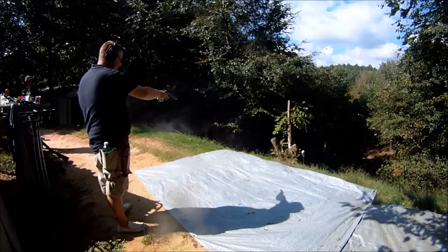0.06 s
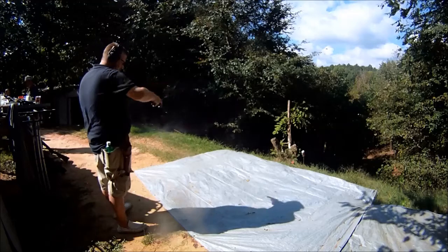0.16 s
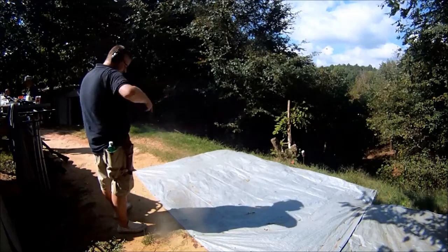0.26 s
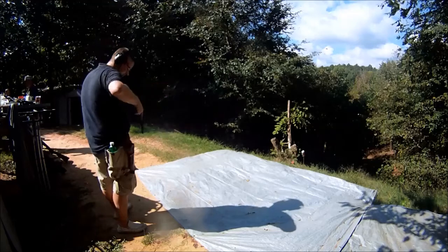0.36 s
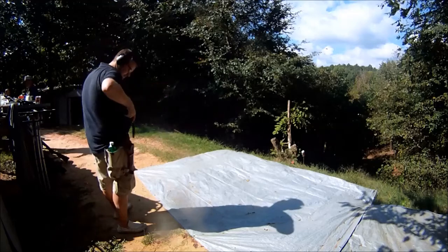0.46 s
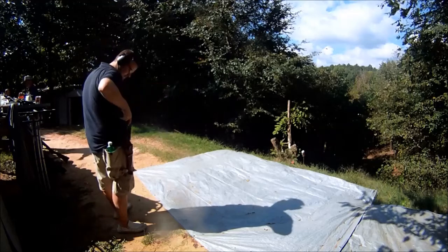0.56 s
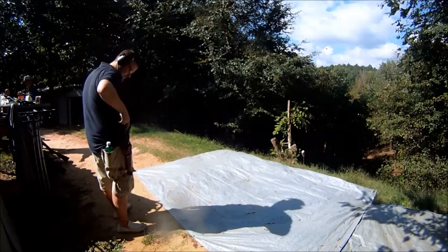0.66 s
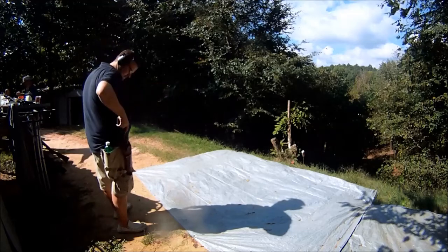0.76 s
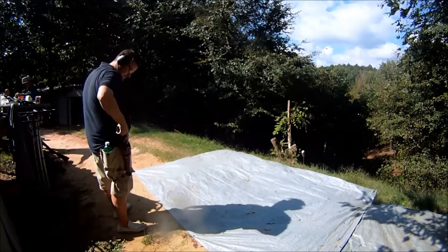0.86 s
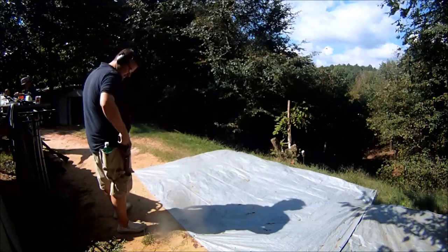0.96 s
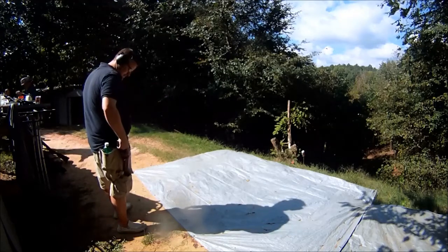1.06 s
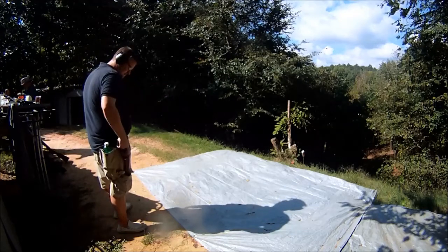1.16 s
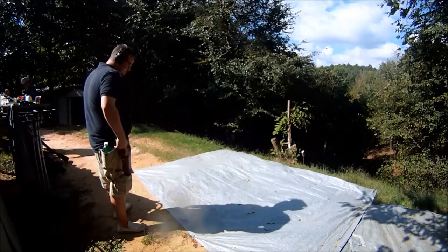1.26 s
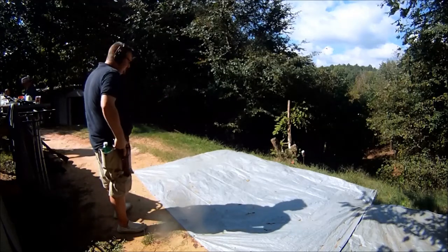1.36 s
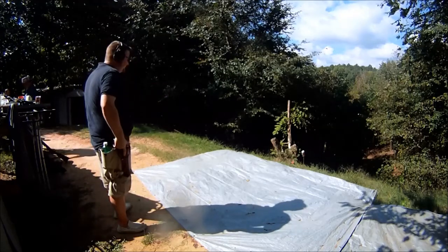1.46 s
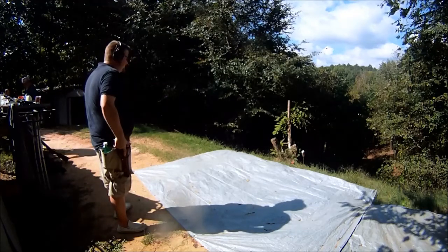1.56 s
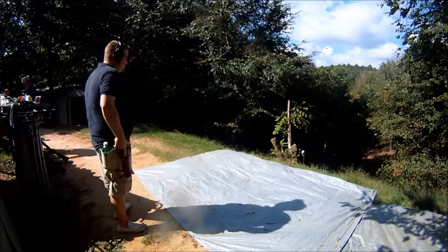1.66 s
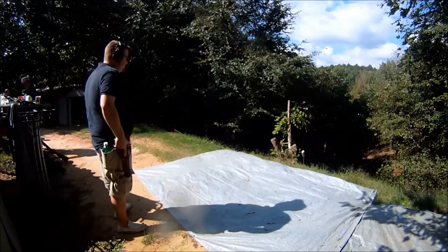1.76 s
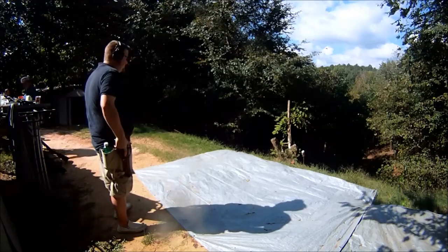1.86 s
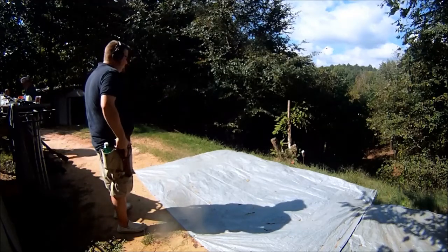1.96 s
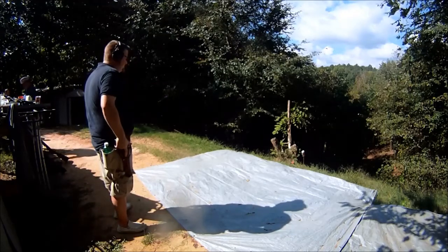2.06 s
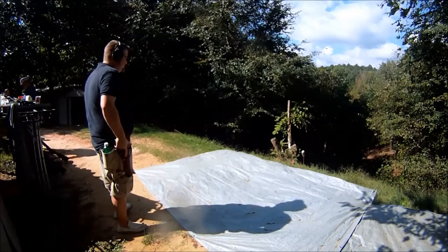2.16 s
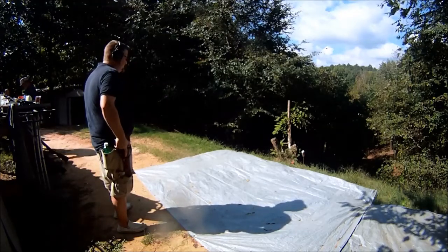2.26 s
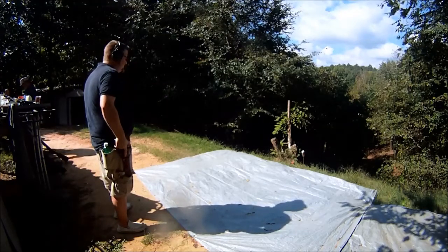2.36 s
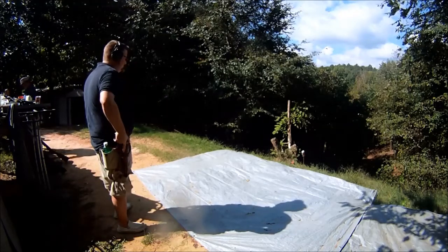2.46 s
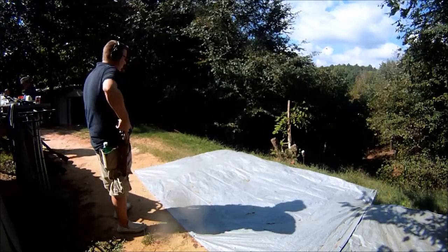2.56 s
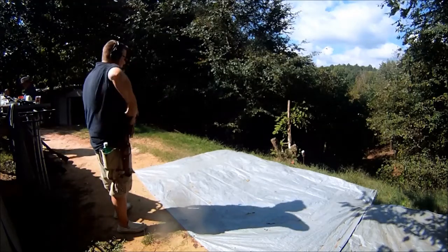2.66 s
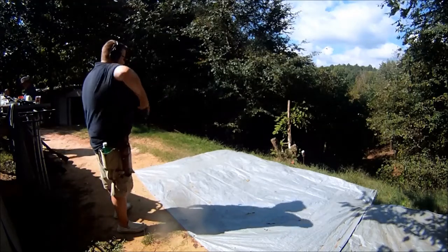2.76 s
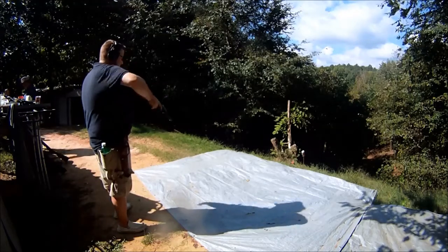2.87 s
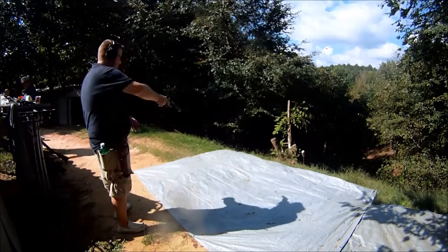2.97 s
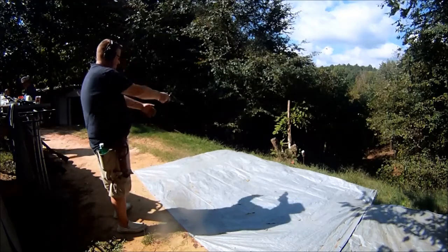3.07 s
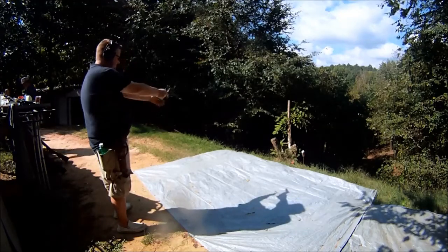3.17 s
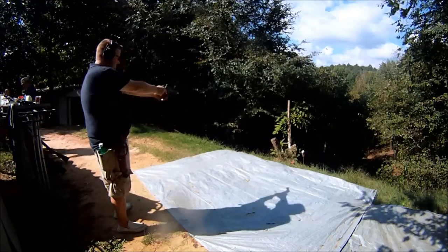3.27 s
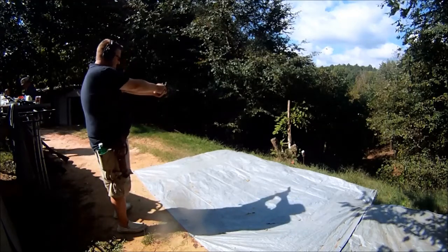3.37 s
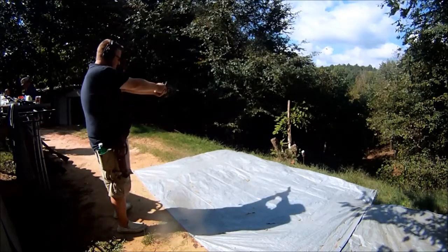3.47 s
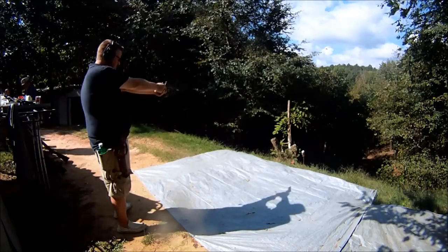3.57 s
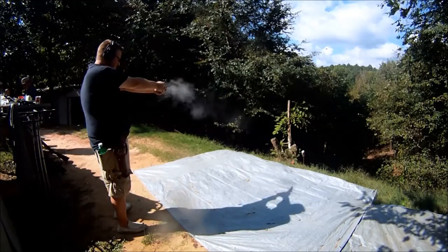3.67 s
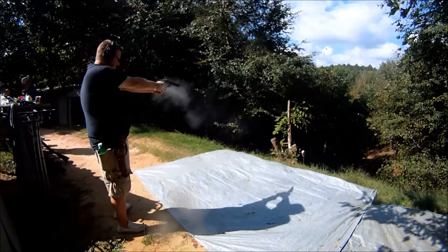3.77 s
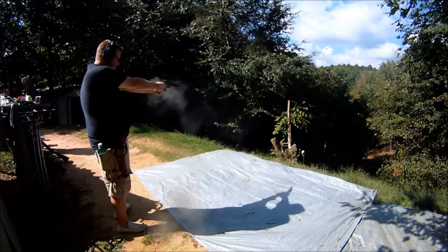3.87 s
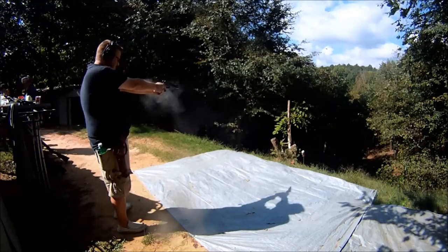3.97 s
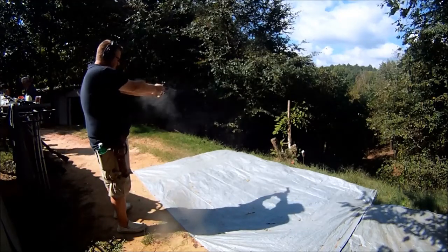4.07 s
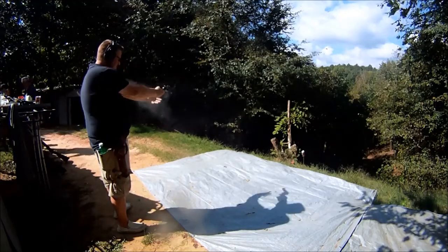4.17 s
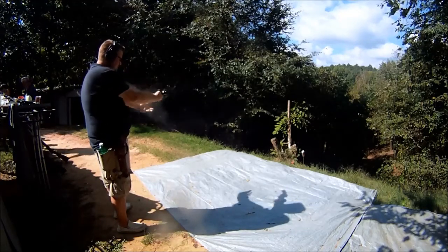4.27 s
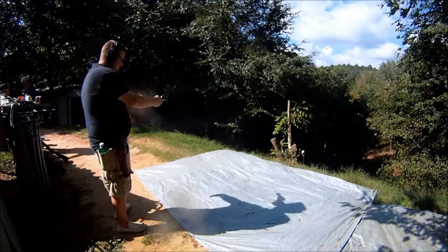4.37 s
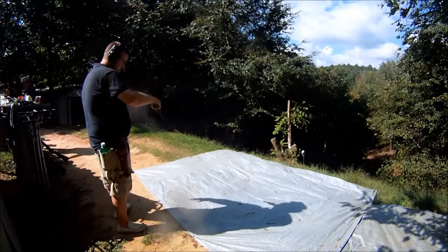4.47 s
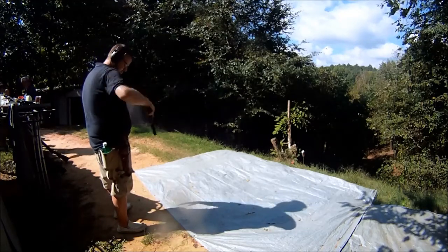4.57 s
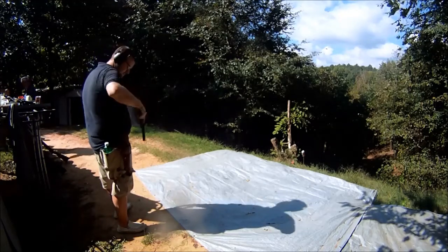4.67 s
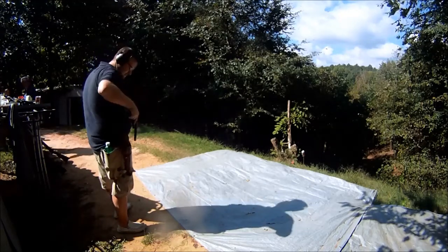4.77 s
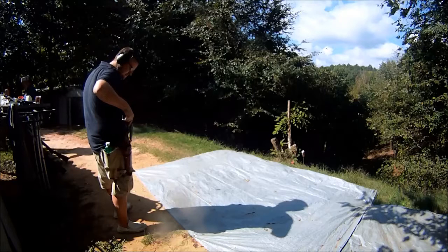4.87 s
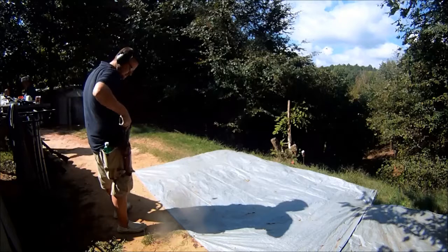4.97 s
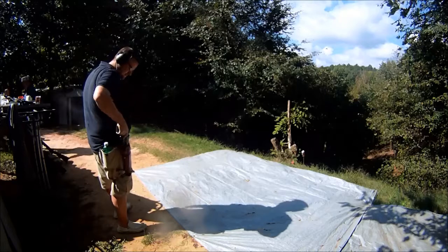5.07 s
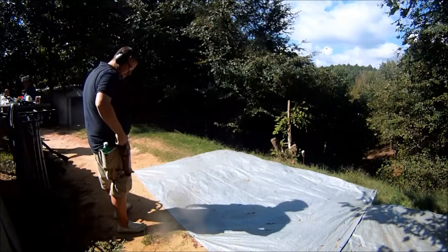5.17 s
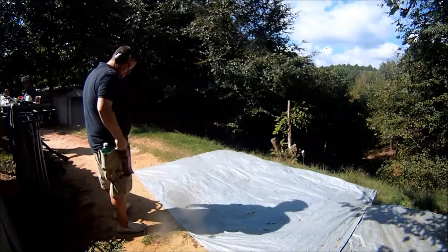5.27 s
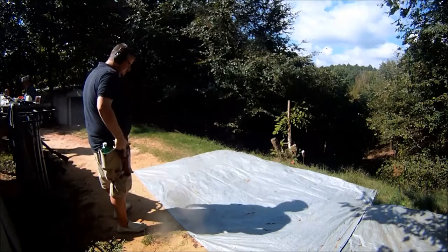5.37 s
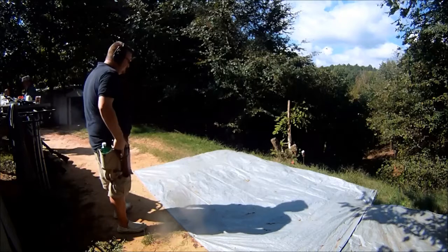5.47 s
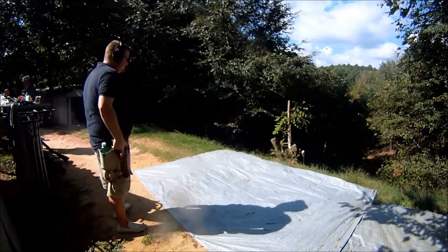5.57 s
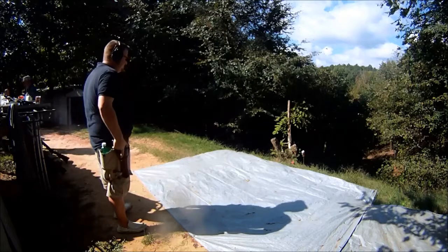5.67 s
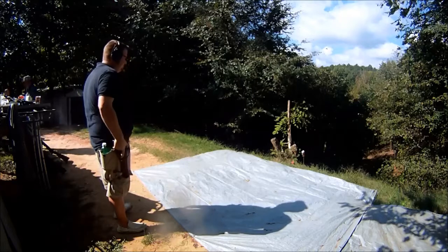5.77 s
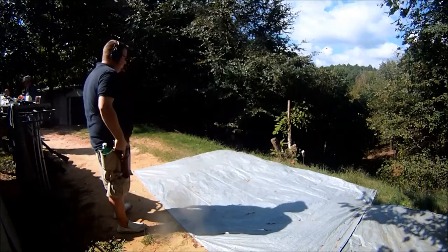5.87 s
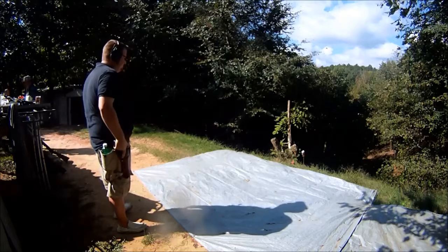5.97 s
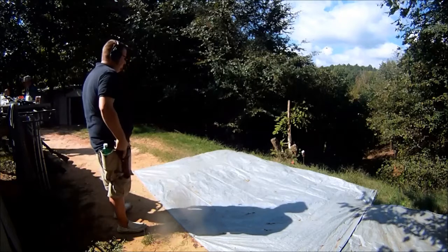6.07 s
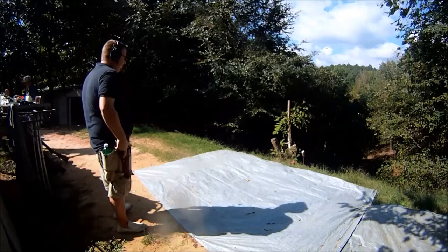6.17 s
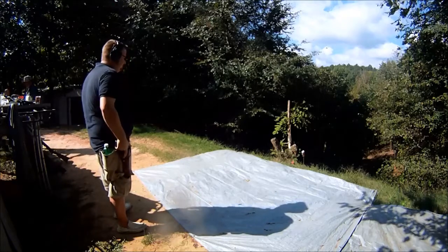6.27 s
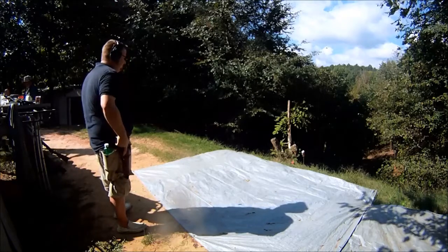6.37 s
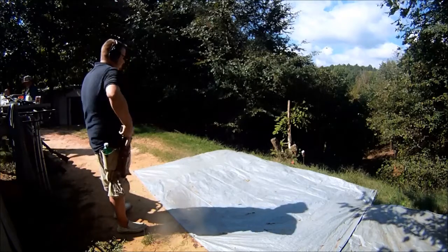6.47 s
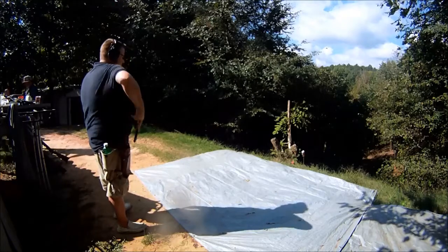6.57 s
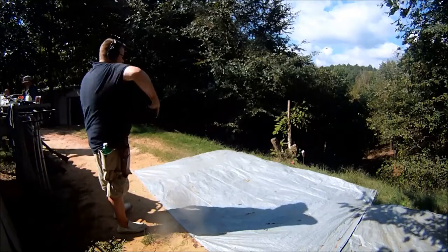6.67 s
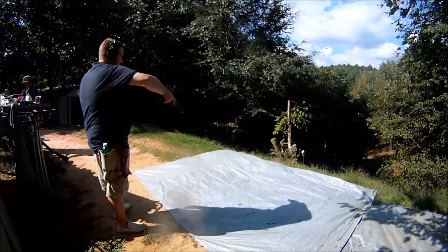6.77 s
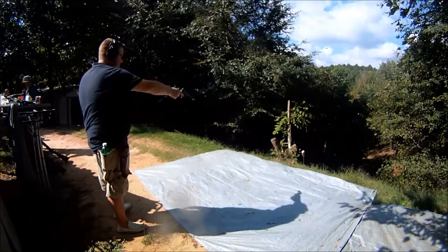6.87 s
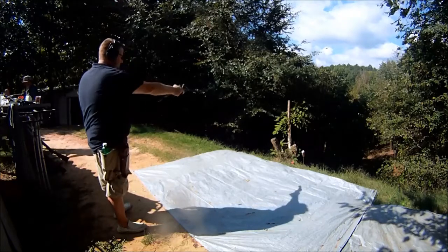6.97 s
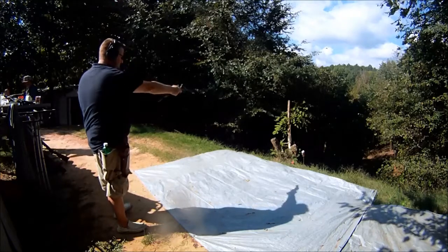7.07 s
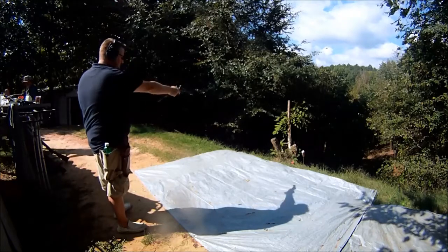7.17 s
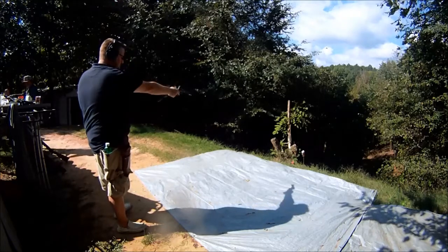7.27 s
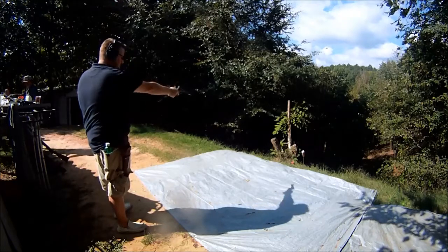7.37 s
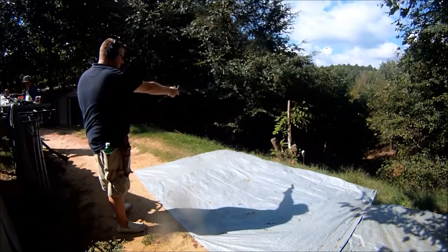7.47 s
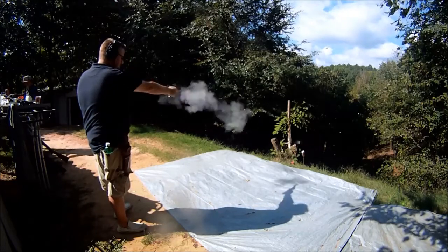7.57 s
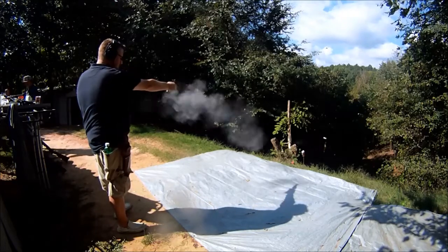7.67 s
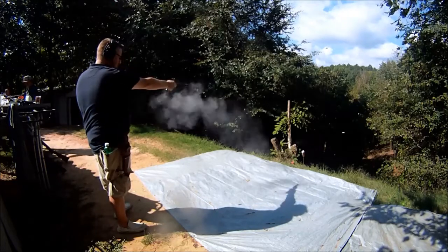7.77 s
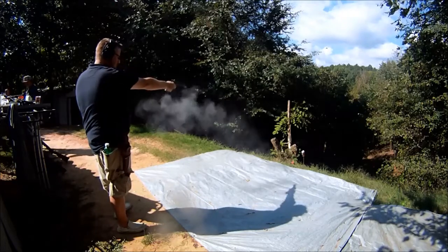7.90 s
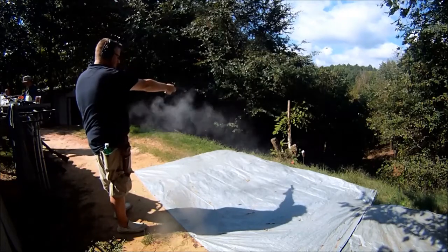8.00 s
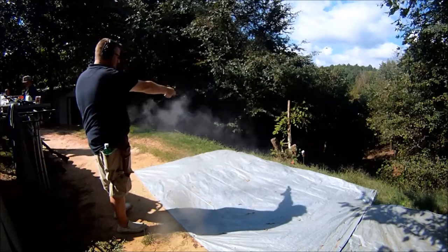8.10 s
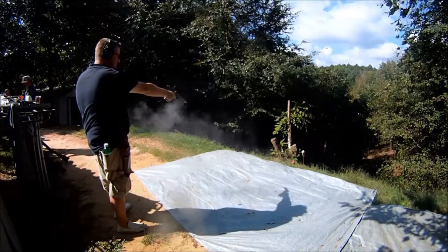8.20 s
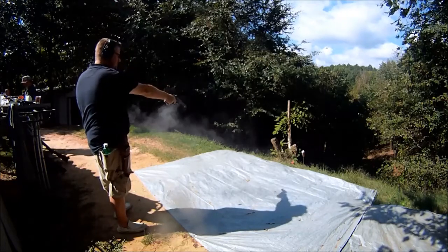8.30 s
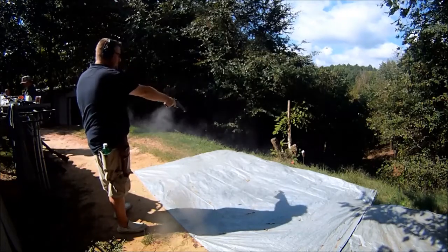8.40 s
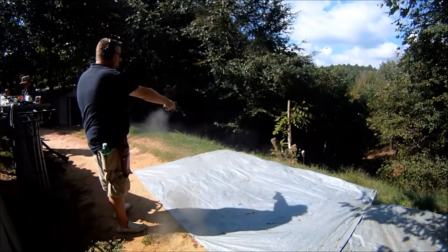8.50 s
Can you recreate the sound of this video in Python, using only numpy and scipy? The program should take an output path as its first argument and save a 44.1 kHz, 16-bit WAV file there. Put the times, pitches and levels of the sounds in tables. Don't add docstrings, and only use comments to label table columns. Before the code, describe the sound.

Two overloaded revolver shots, seconds apart on a wooded slope, each rolling back in echoes, with holster scrapes and ticks between.

```python
import sys
import numpy as np
from scipy import signal
from scipy.io import wavfile
from scipy.ndimage import uniform_filter1d

SR = 44100
rng = np.random.default_rng(int(sys.argv[2]) if len(sys.argv) > 2 else 0)


def attenuation_scalar(level_db):
    decades = np.asarray(level_db, float) / 20
    return 10 ** decades


def master(y):
    cut = np.clip(np.atleast_2d(y).T, -1, 1)
    pcm = np.round(cut * 32767)
    wavfile.write(sys.argv[1], SR, pcm.astype(np.int16))


N = 376613

# start_s, level_db, front_ms
BLASTS = [
    [(3.6891, 30, .5), (3.6901, 28, .25), (3.6915, 28, .15), (3.6919, 30, 1.15), (3.6933, 30, .3),
     (3.6946, 34, 1.35)],
    [(7.6730, 28, .4), (7.6735, 30, .3), (7.6739, 32, .45), (7.6751, 32, .2), (7.6755, 36, 1.9),
     (7.6780, 45, 3.2)],
]
# level_db, fade_60db_s, hold_ms (until the gain falls), cut_db
SPLASH = [(15, 0.037, 5.7, -17), (14, 0.041, 6.67, -11)]
EARLIER_SHOT_S = -0.53
FIRED_S = [EARLIER_SHOT_S] + [arrivals[0][0] for arrivals in BLASTS]
# pitch_hz, level_db (per Hz)
OUTDOOR_TONE = [(35, -52), (60, -20), (145, -13.5), (205, -12.5), (280, -8), (477, -2), (600, -3),
                (750, -6.5), (934, -15), (1320, -14.5), (2490, -6.5), (3320, -21.5), (3790, -20),
                (5900, -35.5), (7670, -65.5), (13000, -120)]

# after_shot_s, level_db
VALLEY_ROLL = [(.02, -36.5), (.14, -37), (.36, -24.5), (.6, -36), (.8, -35.5), (1.3, -41.5), (1.7, -44.5),
               (2.4, -55), (3.2, -64)]
ROLL_GAIN_DB = [-2.06, -2.12, 6]
GAIN_BACK_S = 0.92
# low_hz, high_hz, share_db, air_loss_db_per_s, loss_until_s
VALLEY_BANDS = [(83, 618, -1.5, -1.14, 0.91), (603, 915, -1, 3.5, 2.9), (910, 3100, 2.65, 24.5, 1),
                (3070, 9000, -5, 36.5, 1.11)]
# level_db, sinking_db_per_s, clumping_db, kept (share of a stronger shot)
NEAR_TREES = [(-37.5, 62.5, 0.38, 0.98), (-39.5, 50.5, 0.86, 0.93), (-39.5, 9, -0.25, 0.53),
              (-35, 15, -0.9, 0.2)]
TREELINE_S, BEYOND_DB_PER_S = 0.36, 58
PORT_HZ, PORT_WIDTH_HZ, PORT_DB = 3830, 350, -12
# after_shot_s, peak_db, fade_60db_s
RIDGE = (0.57, -21.5, 0.17)
# start_s, peak_db, fade_60db_s
SLAPS = [(.23, -18, 0.14), (.46, -25, 0.29), (0.862, -44, 0.055), (0.991, -50, 0.071), (1.052, -27.5, 0.18),
         (4.022, -5, 0.045), (4.055, -30, 0.055), (4.455, -18, 0.14), (4.877, -25.5, 0.13),
         (5.338, -47, 0.058), (5.827, -52, 0.051), (6.58, -41, 0.14), (6.666, -35.5, 0.1),
         (7.589, -34, 0.13), (8.038, -7, 0.065), (8.09, -9, 0.18), (8.445, -25, 0.15)]

# hardest_s, rise_s, fall_s, scrape_db, hollow_body_db
RUBS = [(0.719, .02, .1, -66, -70), (1.062, 0.057, 0.17, -56.5, -42), (2.077, 0.019, 0.09, -44.5, -36.5),
        (2.127, 0.028, 0.13, -51, -42.5), (2.158, 0.014, .12, -49, -35), (2.205, 0.057, 0.26, -58, -48),
        (2.337, 0.036, 0.05, -63, -56), (2.547, 0.024, 0.11, -62, -47.5), (2.67, 0.076, 0.048, -61, -47.5),
        (2.868, 0.063, 0.054, -49.5, -46.5), (2.897, .012, .2, -49.5, -56), (4.625, 0.064, 0.3, -53, -37),
        (5.2, .03, 0.067, -61, -68.5), (6.765, 0.018, 0.065, -62, -46), (6.801, 0.1, 0.12, -55, -41.5),
        (6.921, 0.19, 0.065, -60, -62), (6.952, .012, 0.058, -40, -50), (6.995, 0.011, 0.2, -59, -53),
        (7.325, 0.049, 0.18, -62.5, -49.5), (7.42, .06, .2, -69.5, -62), (7.611, 0.044, 0.072, -62, -46),
        (7.655, 0.024, 0.061, -71, -46.5)]
# pitch_hz, level_db (per Hz)
STEEL_TONE = [(710, -55.5), (1200, -44), (1460, -13), (1640, -9), (2220, 1.5), (3200, -14.5), (3830, -6.5),
              (4990, -12.5), (5900, -65), (7670, -37), (13000, -120)]
STROKE_DB = 29.5
GAP_HZ, GAP_OPENS, SQUEAK_DB = 2400, 0.053, -1.5
# start_s, peak_db, fade_60db_s, ring_hz
RINGS = [(0.3721, -50, 0.15, 2550), (0.6237, -48.5, 0.073, 2480), (0.704, -47, 0.13, 2480),
         (0.713, -53, 0.064, 2730), (0.7302, -51, .06, 2580), (.742, -52, .06, 2720),
         (0.7564, -52, 0.046, 2550), (0.7751, -43.5, 0.052, 2400), (.786, -51, 0.054, 2960),
         (2.6683, -58, 0.11, 3650), (2.56, -67, .1, 2500), (2.66, -69, .08, 2350), (2.888, -41, 0.23, 3760),
         (4.615, -56, .14, 3800), (5.205, -60, 0.092, 3660), (6.328, -62, .03, 4800),
         (6.76, -53.5, 0.93, 2400), (6.946, -44.5, 0.24, 3900), (7.0, -55, 0.29, 2870),
         (7.395, -62, 0.34, 2170)]
# start_s, peak_db, fade_60db_s, ring_hz
TICKS = [(0.9687, -49, 0.043, 3850), (0.9997, -44, .066, 3900), (1.0994, -51, 0.12, 3960),
         (2.841, -46.5, 0.1, 2620), (2.8856, -28, 0.077, 3040), (2.8975, -34, 0.043, 2400),
         (4.615, -48, .14, 2400), (5.18, -52, .07, 3300), (5.3235, -56, 0.052, 2400),
         (6.92, -46, 0.14, 2550), (6.943, -29.5, 0.05, 3090), (8.322, -36, 0.086, 2460)]
# start_s, peak_db, fade_60db_s, ring_hz
KNOCKS = [(2.0695, -36.5, .1, 2400), (2.1274, -52, .096, 2540), (2.15, -38, 0.18, 2420),
          (2.1994, -38, 0.066, 2450), (2.5406, -66, .06, 2300), (2.8646, -56, .07, 2510),
          (6.755, -44.5, 0.16, 2370), (6.8194, -61, 0.068, 2400), (6.993, -44, 0.089, 2830),
          (7.2704, -51, .06, 2450), (7.3168, -48, 0.042, 2470)]
# thud_db, ring_db (beside the tick), rise_ms
CONTACT = [(-24, 9.5, 0.93), (-2.5, 3, 0.55), (9, -4.5, 1.5)]

# pitch_hz, level_db (per Hz)
AIR_TONE = [(8, -29.5), (20, -4), (120, -8), (216, -11), (781, -24.5), (1090, -27.5), (1200, -26.5),
            (1380, -25), (1560, -31.5), (1880, -25.5), (2510, -28), (4760, -33.5), (5900, -41), (7670, -74),
            (13000, -120)]
AIR_DB = -52.5
# pitch_hz, width_hz, level_db
HUM = [(119.3, 3, -58.5), (58.5, 4, -65), (163, 4, -65)]
WAVER = 0.35


def evened(x):
    return x / np.sqrt(np.mean(x ** 2) + 1e-20)


def add(mix, start_s, sound):
    part = mix[round(start_s * SR):][:len(sound)]
    part += sound[:len(part)]


def coloured(x, tone, lo_hz=1, hi_hz=20000):
    hz = np.fft.rfftfreq(4096, 1 / SR) + 1
    tone_hz, tone_db = np.transpose(tone)
    level_db = np.interp(np.log(hz), np.log(tone_hz), tone_db)
    edges = (1 + (lo_hz / hz) ** 8) * (1 + (hz / hi_hz) ** 8)
    log_gain = np.log(attenuation_scalar(np.maximum(level_db, -100)) / np.sqrt(edges))
    circle = np.r_[log_gain, log_gain[-2:0:-1]]
    taps = np.fft.ifft(np.exp(np.conj(signal.hilbert(circle)))).real
    return evened(signal.oaconvolve(x, taps)[:len(x)])


def resonate(x, hz, width_hz):
    turn = np.exp(2j * np.pi * np.cumsum(hz * np.ones(len(x))) / SR)
    r = np.exp(-np.pi * width_hz / SR)
    smooth = signal.lfilter([1 - r], [1, -r], x / turn)
    return evened((turn * smooth).real)


def grains(count, per_s, spread_db):
    hit, size, sign = rng.random((count, 3)).T
    strength = attenuation_scalar(-spread_db * np.log(size + .01))
    return (hit < per_s / SR) * strength * np.sign(sign - .5)


def shots():
    out, t = np.zeros(N), np.arange(6000) / SR
    for arrivals, (level_db, fade_s, hold_ms, cut_db) in zip(BLASTS, SPLASH):
        start_s = arrivals[0][0]
        crack = coloured(grains(len(t), 6000, 0.43), OUTDOOR_TONE, lo_hz=850)
        crack += 0.71 * coloured(grains(len(t), 6400, 1.5), AIR_TONE, lo_hz=970)
        fronts = np.zeros(len(t))
        for s, front_db, front_ms in arrivals:
            u = t * 1000 / front_ms
            add(fronts, s - start_s, -attenuation_scalar(front_db) * (1 - u) * np.exp(-u / 1.5))
        fallen = np.clip((t * 1000 - hold_ms) / .8, 0, None)
        fronts *= attenuation_scalar(-40 * fallen)
        crack *= attenuation_scalar(level_db - 60 * t / fade_s + cut_db * np.minimum(fallen / 3.2, 1))
        add(out, start_s, fronts + crack)
    return out


def returns(clump_db, lo_hz, hi_hz):
    clumps = uniform_filter1d(rng.standard_normal(N), 500)
    clumps = evened(uniform_filter1d(clumps, 300))
    return coloured(grains(N, 8000, 3.1) * attenuation_scalar(clump_db * clumps), OUTDOOR_TONE, lo_hz, hi_hz)


def rolling_echo():
    out, now = np.zeros(N), np.arange(N) / SR
    which = np.searchsorted(FIRED_S, now) - 1
    since = now - np.take(FIRED_S, which)
    valley_db = np.interp(since, *np.transpose(VALLEY_ROLL))
    stronger_db = np.take(ROLL_GAIN_DB, which) * np.minimum(since / GAIN_BACK_S, 1)
    for band_row, tree_row in zip(VALLEY_BANDS, NEAR_TREES):
        lo_hz, hi_hz, share_db, loss_db, until_s = band_row
        near_db, sink_db, clump_db, kept = tree_row
        far = attenuation_scalar(valley_db + share_db - loss_db * np.minimum(since, until_s))
        near = attenuation_scalar(near_db - sink_db * since - BEYOND_DB_PER_S * np.maximum(since - TREELINE_S, 0))
        level = np.hypot(far, near) * attenuation_scalar(kept * stronger_db) * (since > .012)
        band = returns(clump_db, lo_hz, hi_hz)
        if lo_hz < PORT_HZ < hi_hz:
            band = band + attenuation_scalar(PORT_DB) * resonate(band, PORT_HZ, PORT_WIDTH_HZ)
        out += level * band
    return out


def slaps():
    out, t = np.zeros(N), np.arange(6000) / SR
    after_s, ridge_db, ridge_fade_s = RIDGE
    ridge = [(s + after_s, ridge_db + db, ridge_fade_s) for s, db in zip(FIRED_S, ROLL_GAIN_DB)]
    for start_s, peak_db, fade_s in ridge + SLAPS:
        slap = grains(len(t), 3600, 2.3)
        slap[0] = 4.3
        fade = attenuation_scalar(peak_db - 12.5 - 60 * t / fade_s)
        add(out, start_s, fade * coloured(slap, OUTDOOR_TONE, lo_hz=250, hi_hz=920))
    return out


def holster_rubs():
    out, stroke = np.zeros(N), np.arange(-5000, 12000) / SR
    for hardest_s, rise_s, fall_s, scrape_db, body_db in RUBS:
        push = attenuation_scalar(-STROKE_DB * np.maximum(-stroke / rise_s, stroke / fall_s))
        slips = grains(len(stroke), 3000, 0.66)
        flex = evened(uniform_filter1d(rng.standard_normal(len(slips)), 500))
        gap_hz = GAP_HZ * (1 + GAP_OPENS * np.clip(stroke / fall_s, 0, 1))
        squeak = attenuation_scalar(SQUEAK_DB) * resonate(slips, gap_hz * (1 + 0.02 * flex), 115)
        scrape = (coloured(slips, STEEL_TONE) + squeak) / np.sqrt(1 + attenuation_scalar(2 * SQUEAK_DB))
        body = coloured(slips, OUTDOOR_TONE, lo_hz=385, hi_hz=1100)
        add(out, hardest_s + stroke[0], push * (attenuation_scalar(scrape_db) * scrape + attenuation_scalar(body_db) * body))
    return out


def holster_catches():
    out, t = np.zeros(N), np.arange(6000) / SR
    for rows, (thud_db, ring_db, rise_ms) in zip([RINGS, TICKS, KNOCKS], CONTACT):
        for start_s, peak_db, fade_s, ring_hz in rows:
            rattle = grains(len(t), 4500, 2.2)
            rattle[0] = 5.2
            width_hz = ring_hz / 22 * ring_hz / 2500
            tick = coloured(rattle, STEEL_TONE) + attenuation_scalar(ring_db) * resonate(rattle, ring_hz, width_hz)
            thud = coloured(rattle, OUTDOOR_TONE, lo_hz=312, hi_hz=1290)
            rise = np.minimum((t * 1000 + 0.079) / rise_ms, 1)
            fade = attenuation_scalar(peak_db - 9.5 - 60 * t / fade_s)
            add(out, start_s, rise * fade * (tick + attenuation_scalar(thud_db) * thud))
    return out


def background():
    t = np.arange(N) / SR
    sound = attenuation_scalar(AIR_DB - 2.5) * coloured(rng.standard_normal(N), AIR_TONE)
    for hz, width_hz, level_db in HUM:
        unsteady = WAVER * resonate(rng.standard_normal(N), hz, width_hz)
        sound += attenuation_scalar(level_db) * (np.sin(2 * np.pi * hz * t) + unsteady)
    duck_db = np.zeros(N)
    for shot_s in FIRED_S:
        since = t - shot_s
        duck_db -= 25 * (since > 0) * np.exp(-np.maximum(since, 0) / 0.083)
    return attenuation_scalar(duck_db) * sound


def scene():
    woods = rolling_echo() + slaps()
    holster = holster_rubs() + holster_catches()
    return (shots() + woods + holster + background())[None]


def band_limit(x):
    return signal.sosfilt(signal.butter(12, 16340, fs=SR, output="sos"), x)


def record(dry):
    end_fade = np.minimum(np.arange(N)[::-1] / 150, 1)
    railed = np.clip(dry * end_fade, -1.08, 1.08)
    coupled = signal.lfilter(*signal.butter(1, 42, "high", fs=SR), railed)
    slow = np.clip(signal.resample_poly(coupled, 40, 147, axis=1), -.97, .97)
    held = signal.resample_poly(np.repeat(slow, 4, axis=1), 147, 160, axis=1)
    held = np.pad(held, ((0, 0), (0, 8)))[:, :N]
    treble_edge = signal.firwin(255, 15400, window=("kaiser", 8), fs=SR)
    held = signal.oaconvolve(held, treble_edge[None], "same")
    return band_limit(np.clip(held, -1, 1))


dry = scene()
out = record(dry)
master(out)
```